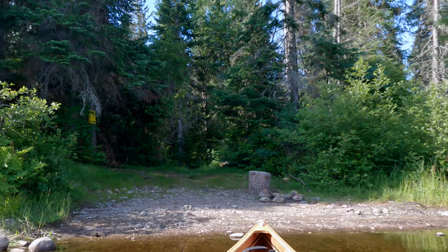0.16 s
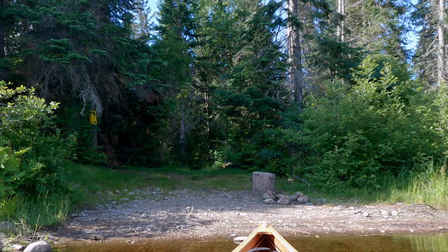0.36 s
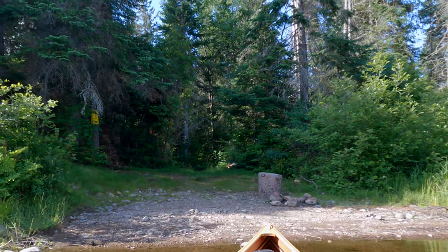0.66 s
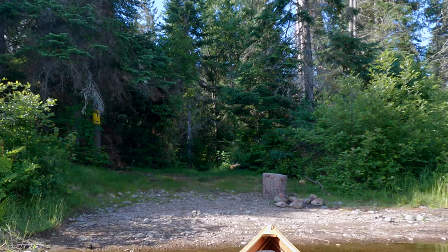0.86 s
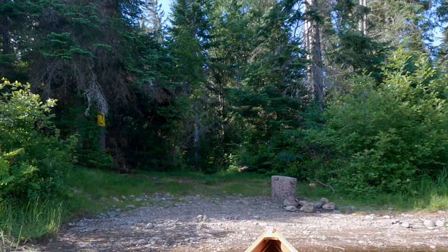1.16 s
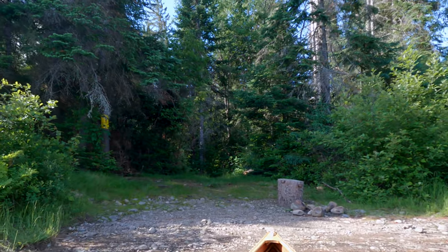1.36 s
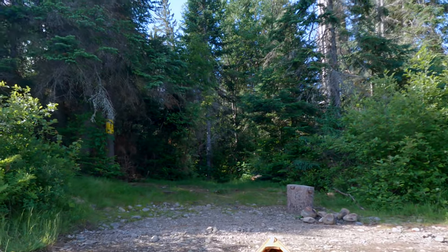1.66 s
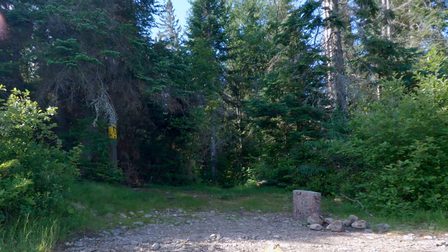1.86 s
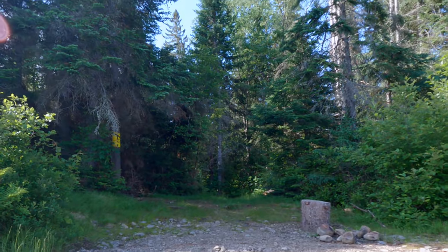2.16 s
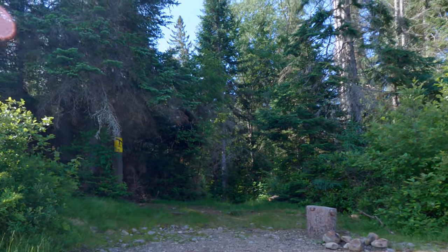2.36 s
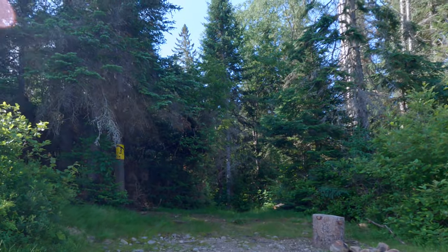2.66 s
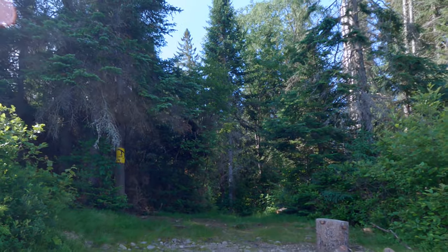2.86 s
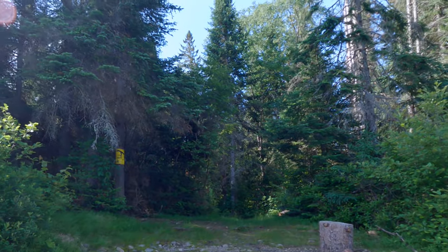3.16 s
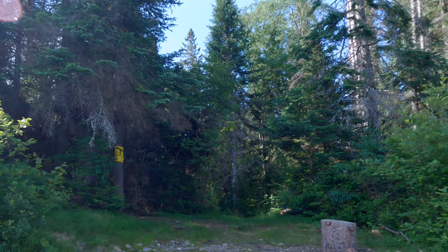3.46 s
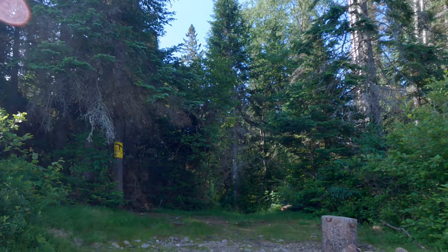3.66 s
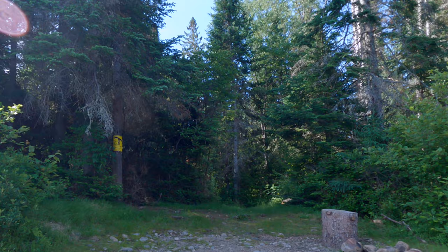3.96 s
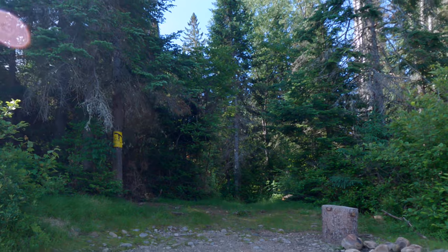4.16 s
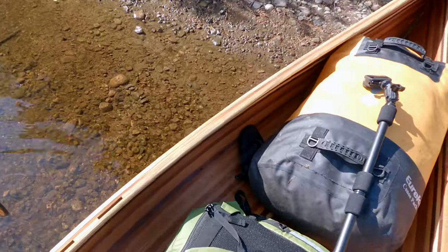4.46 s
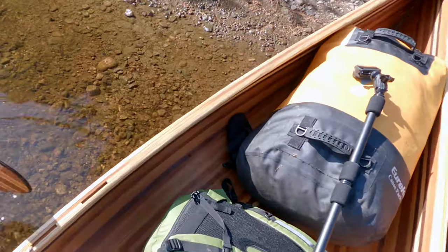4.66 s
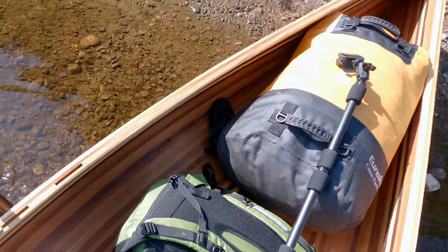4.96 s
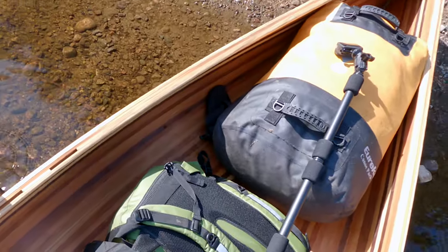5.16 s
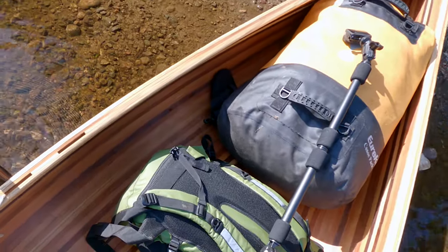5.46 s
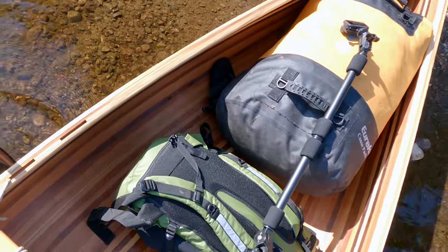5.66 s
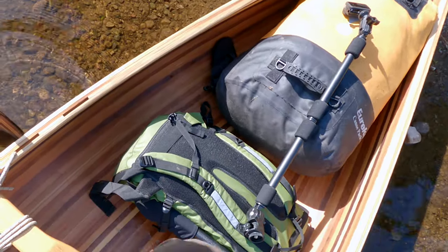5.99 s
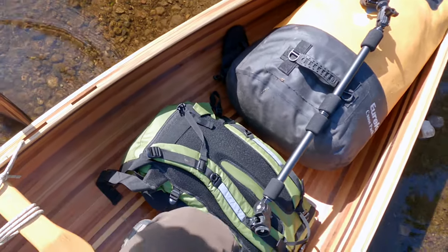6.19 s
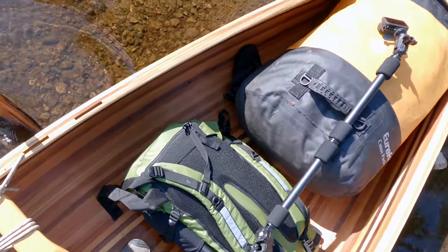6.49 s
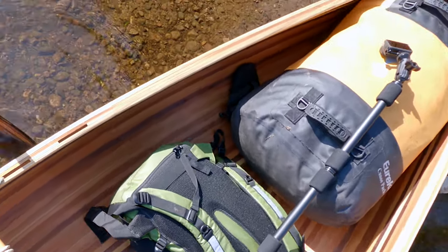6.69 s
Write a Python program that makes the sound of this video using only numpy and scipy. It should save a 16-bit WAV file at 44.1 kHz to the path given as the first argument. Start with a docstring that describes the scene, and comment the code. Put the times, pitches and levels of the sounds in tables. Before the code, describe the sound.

Water bubbles and wind rumbles close by before a hull scrapes harshly onto stones; after a short gap, light wooden knocks and soft thumps follow.

```python
"""Canoe landing on gravel

Close by, a wooden canoe glides through gurgling shallows: ringing bubbles over washes of filtered noise, with
low wind rumble on the microphone and one far bird whistle. It grinds up the shore in a long push and lurches,
random slips exciting the modes of the shuddering, groaning hull, while stones snap, crunch and squeak. After a
short silent break it lies aground: a paddle knocks and slides on it, and shifting weight thumps and drags."""
import sys
import numpy as np
from scipy import signal
from scipy.fft import rfft, irfft
from scipy.io import wavfile
from scipy.ndimage import uniform_filter1d

SR = 44100
rng = np.random.default_rng(int(sys.argv[2]) if len(sys.argv) > 2 else 0)


def to_wav(s):
    """Save 16-bit WAV."""
    ch = np.atleast_2d(s).T  # columns
    pcm = np.round(np.clip(ch, -1, 1) * 32767)  # PCM
    wavfile.write(sys.argv[1], SR, pcm.astype(np.int16))


N = 301201
TIME = np.arange(N) / SR
RING_TIME = TIME[:SR // 4]   # time axis of every single short sound

# Larger air pockets in the water. Each row: start in seconds, level in dB, pitch in Hz, ring in seconds.
GURGLES = [(.24, -45, 1950, .05), (0.313, -39, 1870, 0.049), (.345, -45, 1380, 0.026),
           (0.36, -34, 747, 0.028), (0.372, -26.5, 592, 0.053), (0.443, -38, 1510, 0.017),
           (0.603, -36, 1410, 0.028), (.669, -28, 1330, 0.018), (0.774, -38, 1590, 0.062),
           (.857, -24.5, 870, 0.012), (0.943, -31, 546, 0.05), (.909, -35, 1600, .04),
           (.977, -35, 1210, .03), (1.027, -36.5, 1420, 0.035), (1.095, -47, 1910, .04),
           (1.39, -39, 1044, .07), (1.219, -31.5, 1150, 0.035), (1.339, -31, 1100, 0.023),
           (1.676, -42.5, 1354, 0.069), (1.854, -44.5, 486, 0.075), (2.022, -50, 1830, 0.054)]
# Swirls whose cavity opens or closes. Each row: start in seconds, peak in dB, first pitch in Hz,
# last pitch in Hz, length in seconds.
SWIRLS = [(0.169, -47, 420, 745, 0.074), (.258, -49, 700, 1000, 0.04), (0.259, -53, 1930, 2480, .03),
          (.308, -51, 2450, 2140, 0.021), (0.911, -36.5, 735, 1100, 0.03), (0.931, -42, 1610, 1450, 0.029),
          (0.958, -46, 1590, 1390, 0.017), (1.232, -36, 820, 1190, .032), (2.06, -53.5, 840, 970, 0.035),
          (2.213, -51, 780, 990, 0.032), (2.231, -49, 1500, 1320, 0.028), (2.238, -53, 730, 920, 0.032),
          (2.257, -50.5, 1150, 1480, 0.025)]
# Drops falling back on the water. Each row: start in seconds, level in dB, pitch in Hz.
DROPS = [(.513, -50, 2880), (.541, -47, 3800), (.639, -50, 2900), (0.669, -40, 2720), (.675, -46, 3580),
         (.686, -44, 2720), (.768, -42, 2890), (.819, -47, 3420), (.887, -59, 2830), (.941, -50, 5300),
         (.949, -50, 4050), (.975, -54, 4020), (1.025, -48, 2930), (1.141, -46, 2950), (1.143, -43, 3800),
         (1.153, -45, 5200), (1.159, -36.5, 4080), (1.197, -49, 2830), (1.22, -43, 2880),
         (1.243, -40, 2980), (1.268, -47, 5230), (1.286, -44, 3030), (1.338, -54, 3950), (1.37, -52, 2850),
         (1.398, -50, 5060), (1.409, -44, 3890), (1.427, -46, 3230), (1.474, -43, 2450),
         (1.476, -45.5, 3900), (1.541, -43, 2770), (1.598, -48, 2620)]
# Ripple along the gliding hull. Each row: time in seconds, relative level in dB.
RIPPLE = [(0, -62.5), (.33, -49.5), (.5, -59), (.75, -48.5), (1.25, -46), (1.8, -55.5), (2.05, -64),
          (2.25, -58), (2.48, -60)]
# Wavelets slapping the bow. Each row: start in seconds, hold in seconds, relative level in dB.
LAPS = [(0.37, .012, -55), (0.808, 0.061, -32.5), (0.895, 0.16, -47.5), (1.231, 0.036, -36.5),
        (1.31, 0.027, -62), (2.16, 0.027, -64)]
# Low rumbles: gusts on the microphone and, near 3.6-4.0 s, the shuddering hull.
# Each row: start in seconds, hold in seconds, relative level in dB.
RUMBLES = [(0, 0.48, -35.5), (0.604, 0.34, -35.5), (1.186, 0.32, -37), (1.633, 0.081, -43),
           (1.883, 0.16, -44.5), (2.252, 0.11, -40.5), (2.526, 0.58, -42), (3.615, 0.048, -35),
           (3.997, 0.036, -35), (6.0, 0.23, -45), (6.45, 0.45, -58)]
# Dull blows on the hull. Each row: start in seconds, level in dB, pitch in Hz, treble cutoff in Hz,
# ring in seconds.
THUMPS = [(.001, -24, 276, 465, 0.15), (.004, -24.5, 156.4, 303, 0.27), (2.154, -39, 172, 900, 0.23),
          (2.426, -46.5, 159, 1080, 0.012), (2.655, -23, 139, 250, 0.22), (2.715, -27, 139, 252, 0.16),
          (2.76, -26.5, 109, 250, 0.31), (2.821, -21, 175.5, 249, 0.33), (3.055, -29, 138, 250, 0.15),
          (3.94, -20, 154.3, 496, 0.13), (3.968, -21, 125, 550, 0.071), (3.997, -23.5, 169, 398, 0.11),
          (4.180, -31.5, 128.5, 497, 0.13), (5.612, -37.5, 204, 364, 0.13),
          (5.980, -28.5, 186.5, 770, 0.08), (6.051, -35.5, 150, 610, 0.052), (6.115, -47, 156, 600, 0.06),
          (6.209, -36.5, 152, 590, 0.074), (6.317, -41, 164, 804, 0.14), (6.436, -38.5, 165, 800, 0.23),
          (6.734, -47, 189, 700, 0.76)]
# Soft bumps of the floor as the grounded boat rocks. Each row: start in seconds, level in dB.
BUMPS = [(4.569, -51.5), (4.781, -53), (4.945, -47), (5.032, -44.5), (5.109, -48), (5.139, -42),
         (5.175, -43.5), (5.372, -43.5), (5.531, -50.5)]
# Modes of the hull's floor. Each row: multiple of its pitch, relative level in dB, share of the ring time.
FLOORBOARD = [(1, 13.5, 0.95), (1.43, 5, 0.94), (1.8, -27.5, 0.41), (2.359, -18, 0.34), (2.75, -0.5, 0.6),
              (3.6, -27.5, 0.18)]
# The long push. Each row: time in seconds, relative grinding level in dB, weight on the keel in dB.
PUSH = [(2.555, -49.5, -1), (2.6, -35.5, -14), (2.64, -27, 0.5), (2.72, -26, 3.5), (2.83, -25.5, 1),
        (2.89, -26, -2.5), (3.03, -26, -1), (3.17, -31.5, -2.5), (3.3, -31, -2), (3.41, -29.5, 2.5),
        (3.48, -32.5, -5.5), (3.6, -30, -2.5), (3.72, -35, 10.5), (3.79, -42.5, -1), (3.85, -45, 5.5),
        (3.92, -38, 7), (4.06, -43.5, 5.5), (4.17, -45, 7.5), (4.24, -47.5, 5.5), (4.37, -47, -0.5)]
# Lurches over stones. Each row: start in seconds, hold in seconds, relative grinding level in dB,
# weight on the keel in dB.
LURCHES = [(2.5, 0.025, -43, -7.5), (2.696, 0.077, -25.5, -17), (3.021, 0.0033, -20, -24),
           (3.37, 0.041, -27, -6), (3.669, 0.028, -35.5, 14.5), (3.827, 0.0054, -31.5, -0.5),
           (3.858, .008, -33, 1.5), (3.89, 0.052, -27, 1), (3.959, 0.025, -40.5, 22),
           (4.025, .008, -37.5, -26), (4.081, 0.036, -35, -5), (4.133, 0.0043, -39.5, 9),
           (4.173, 0.033, -40.5, -0.5)]
# Modes of the hull on the gravel. Each row: pitch in Hz, relative level in dB, 60 dB decay in seconds.
HULL = [(142, -1, 0.21), (180, -5, 0.17), (252.5, 8, 0.074), (280, 1.5, 0.39), (367.8, 3, 0.072),
        (570, -4, 0.25), (614.7, -7, 0.18), (725, -17.5, 0.12), (912, 9.5, 0.091), (995, -3, 0.29),
        (1124, 0, 0.19), (1292, 1, 0.2), (1417, 5.5, 0.068), (1529, 1.5, 0.18), (1950, 6.5, .06),
        (2058, -6.5, 0.084), (3040, 14.5, 0.034), (3620, 1, 0.079), (3900, 7.5, 0.065)]
# Pitch of the planks over the point of contact. Each row: time in seconds, pitch in Hz.
CONTACT = [(2.6, 1040), (2.73, 930), (2.886, 1250), (3.066, 1190), (3.316, 1380), (3.354, 1060),
           (3.476, 1310), (3.696, 1010), (3.754, 1265), (4.208, 1080), (4.262, 1320), (4.35, 943)]
# Stones that snap out from under the keel, and two low groans of the hull (at 3.676 and 3.968 s).
# Each row: start in seconds, level in dB, pitch in Hz, ring in seconds.
SNAPS_AND_GROANS = [(2.499, -48, 1720, 0.12), (2.634, -17.5, 1106, 0.3), (2.670, -19, 966, 0.014),
                    (2.700, -30.5, 4130, 0.4), (2.703, -22.5, 720, 0.13), (2.734, -39, 5580, 0.04),
                    (2.732, -32.5, 3800, .04), (2.759, -34, 1505, .015), (2.817, -37.5, 3850, .04),
                    (2.902, -25.5, 1450, .02), (2.935, -23, 1320, .022), (3.021, -32.5, 7100, 0.06),
                    (3.03, -21, 1340, 0.022), (3.289, -22, 1396, 0.031), (3.289, -33, 3126, 0.03),
                    (3.288, -47, 4700, .02), (3.37, -30.5, 740, 0.041), (3.382, -39.5, 7200, 0.05),
                    (3.384, -38, 3310, .02), (3.661, -31, 1010, 0.014), (3.676, -20.5, 624, 0.28),
                    (3.691, -38, 3160, 0.056), (3.817, -39, 3360, 0.13), (3.889, -34.5, 5040, 0.04),
                    (3.968, -23.5, 540, 0.047), (4.089, -39, 1330, 0.036), (4.108, -44, 4500, .04),
                    (4.111, -38.5, 1160, .05), (4.254, -39, 1330, 0.025), (4.285, -40, 5550, 0.043),
                    (4.308, -42, 1250, 0.023), (4.313, -35, 715, 0.06), (4.319, -39.5, 1077, 0.036)]
# Sharp stones along the varnish. Each row: start in seconds, peak in dB, pitch in Hz, length in seconds.
SQUEAKS = [(2.567, -45, 4750, 0.022), (2.695, -30, 3945, .016), (2.725, -31, 6860, 0.012),
           (2.78, -37, 8100, 0.012), (2.96, -37.5, 2410, .018), (3.13, -43, 4950, 0.019),
           (3.721, -43.5, 3550, 0.039)]
# Paddle sliding along the gunwale. Each row: start in seconds, hold in seconds, relative level in dB,
# treble above body in dB, pitch in Hz.
SLIDES = [(4.66, 0.08, -62, -0.5, 1430), (4.834, 0.031, -51, -3, 1160), (4.876, 0.27, -54, -1, 2070),
          (5.328, 0.08, -68, 14.5, 4050), (5.678, 0.15, -58, -2.5, 2090), (5.877, 0.19, -54.5, 1, 1550),
          (6.044, 0.25, -57, 1.5, 1830), (6.387, 0.026, -49, 7, 2780), (6.448, 0.078, -50, 2, 690),
          (6.598, 0.013, -48, -1.5, 1145), (6.744, 0.011, -42.5, -4, 920), (6.745, 0.013, -50, -3, 4180),
          (6.803, .015, -49.5, -11, 4140), (6.813, 0.05, -39, -4.5, 944)]
# Paddle on the gunwale. Each row: start in seconds, level in dB, treble cutoff in Hz, loss per bounce in dB,
# pitch of the struck spot in Hz, damping time in seconds.
KNOCKS = [(4.909, -47.5, 2500, 3, 1370, 0.16), (4.951, -60, 6000, 20, 4200, .02),
          (4.981, -54, 2800, 20, 1900, 0.034), (5.001, -52, 2000, 15, 1400, 0.045),
          (5.059, -43, 4000, 28, 3400, 0.037), (5.070, -36.5, 3840, 13, 875, 0.63),
          (5.136, -30, 4160, 3.5, 1430, 0.29), (5.240, -50, 2300, 49, 1410, 0.052),
          (5.309, -64, 3500, 20, 2320, .03), (5.408, -55.5, 2500, 18, 1570, 0.033),
          (5.615, -36, 4130, 5, 1960, .5), (5.630, -44, 3600, 14, 2080, .1),
          (5.647, -51, 4500, 18, 2400, .05), (5.688, -60, 2500, 18, 1900, .04),
          (5.711, -56, 2600, 19, 2080, 0.046), (5.753, -44, 2120, 4, 1520, 0.13),
          (5.983, -51.5, 4500, 17, 2220, 0.062), (6.186, -55, 5000, 20, 4000, .05),
          (6.212, -54, 4000, 20, 2000, .1), (6.361, -46.5, 4180, 3, 2300, .03),
          (6.389, -47, 4200, -1.5, 2580, 0.045), (6.403, -40, 3600, 16, 2090, 0.046),
          (6.420, -30, 2170, 10, 1380, 0.2), (6.595, -42.5, 4960, 8, 3240, .025),
          (6.734, -38, 2170, 6, 900, 0.17), (6.752, -38, 1380, 20, 920, 0.094),
          (6.798, -35.5, 1200, 3, 890, 0.11)]
# Modes of paddle and gunwale. Each row: pitch in Hz, relative level in dB, 60 dB decay in seconds.
GUNWALE = [(658, -17, 0.34), (879, -0.5, 0.076), (1204, 1, 0.048), (1390, -0.5, 0.032), (1633, -9, 0.087),
           (2034, 4.5, 0.024), (2070, -10, 0.27), (2560, -5.5, 0.025), (2945, -3, 0.072), (3425, 3, 0.022),
           (3885, -4, 0.047), (4470, -7, 0.061), (5270, -6.5, 0.081)]
# Weight dragged softly over the floor. Each row: start in seconds, hold in seconds, level in dB.
DRAGS = [(5.987, 0.1, -52.5), (6.218, .06, -57.5), (6.44, 0.053, -49.5)]
# Filter curves, one for each layer. Each row: frequency in Hz, relative level in dB.
AIR_COLOUR = [(70, -40.5), (130, -5.5), (200, 2), (420, -12.5), (1100, -8.5), (2050, -12.5), (2700, -17.5),
              (4200, -18.5), (7600, -30), (12800, -44.5), (15000, -66.5)]
WATER_COLOUR = [(59, 10.5), (100, 2), (252, 0), (359, -8), (748, -15), (867, -16), (1700, -10),
                (2320, -21.5), (2920, -20.5), (3460, -25.5), (4000, -21.5), (7830, -32.5), (13200, -51.5),
                (15000, -74.5)]
HISS_COLOUR = [(2500, -30), (4200, 1.5), (5300, 1.5), (6300, -2.5), (7300, 3), (7900, 5.5), (8500, -10),
               (13000, -33)]
SPRAY_COLOUR = [(1180, -38), (2000, -3), (2270, -5), (4380, 0), (8530, -12), (13700, -28), (15000, -36)]
RUMBLE_COLOUR = [(8.8, -48), (15, 3), (42, 2), (139, -10.5), (172, -14), (210, -17), (250, -17),
                 (320, -35.5), (550, -120)]
BOOM_COLOUR = [(24, -46), (45, -20), (85, -1), (134, -3.5), (215, 0.5), (274, -0.5), (350, 7), (483, 2.5),
               (599, 5), (795, -10), (874, 0.5), (1000, -3), (1300, -32.5), (2200, -120)]
GRAVEL_COLOUR = [(290, -29), (500, 12.5), (611, 4.5), (791, -4.5), (875, -9), (1290, -1.5), (1790, -8),
                 (2160, -6), (2680, -17.5), (3890, -17), (6160, -29), (6810, -27.5), (8570, -32),
                 (13600, -53.5), (15400, -62.5)]
RUB_COLOUR = [(180, 10.5), (300, -6.5), (480, -12.5), (650, -9), (820, -12.5), (980, -7.5), (1150, -8.5),
              (1400, -9), (2000, -3.5), (2900, -11.5), (4000, -11), (5000, -16), (8300, -24.5),
              (15000, -46)]

AIR_DB = -60
WASH_DB, WASH_FOLLOWS = -34, 0.49   # the low wash swings less than the ripple
LAP_ATTACK_S, LAP_RELEASE_S = 0.0049, 0.033
LAP_POCKET_HZ = 395   # air trapped under the bow rings with each wavelet
BUBBLE_RISE_PER_S = 4.8   # share of its pitch that a rising air pocket gains in a second
DROP_RING_S, DROP_RISE = 0.02, 0.05   # the rise is a share of the pitch
DROP_SPLASH_DB = -7   # the soft splash round each drop
HISS_S, HISS_HOLD_S, HISS_DB = 1.2, 0.13, -70   # the bow wave hisses in the shallows
SPRAY_DB, SPRAY_FADE_DB_PER_S = -55.5, 72   # the last spray off the bow dies away
RUMBLE_ATTACK_S, RUMBLE_RELEASE_S, CALM_DB = 0.093, 0.084, -80   # calm on the same scale as the rumbles
BUMP_PITCH_HZ, BUMP_BRIGHT_HZ, BUMP_RING_S = 185.4, 299, 0.072
BIRD_DB = -77.5   # where the whistle begins
BOOM_DB, GRIT_DB = -2.5, -9.5   # gains against the grinding, ahead of the mix in scrape()
LURCH_ATTACK_S, LURCH_RELEASE_S = 0.0033, 0.019
WEIGHT_MUFFLES = 0.15   # dB of grit lost for each dB of weight; the boom gains it in full
CONTACT_WIDTH_OCT, CONTACT_DB = 0.35, -5
SMALL_SQUEAKS_DB, CRUNCH_DB, CHIPS_DB = -9.5, -5, -8   # within their bands of the scrape
STONE_PING_DB, STONE_PING_S = 1, 0.036   # the brief pure ring, against its crack
SQUEAK_WAVER = 0.024   # share of the pitch by which a squeak wavers
SLIDE_ATTACK_S, SLIDE_RELEASE_S = 0.043, 0.048
SING_DB, SING_WIDTH = -7.5, 1.043   # the band that sings under a slide: level, band edge over centre
CRACKLE_PER_S, CRACKLE_DB = 420, -7   # sand under the paddle
BOUNCE_S = 0.0044   # each knock chatters twice more
SPOT_DB, SPOT_WIDTH, SPOT_RING_S = -0.5, 1.266, 0.11   # the struck spot: level, band edge over centre, decay
RATTLE_DB, RATTLE_S = -13, .17
TICK_DB, TICK_TOP_HZ = -19, 9000   # the first touch of a knock
STOP_S, RESUME_S = 4.374, 4.555   # the silent break
CUTOFF_HZ = 15400


def from_db(db):
    """Decibels to gain."""
    return 10 ** (np.asarray(db) / 20)


def rms_one(x):
    """Scale to unit power."""
    return x / np.sqrt(np.mean(x ** 2) + 1e-20)


def evened(x):
    """Hold the slow level at 1 and keep the grain."""
    return x / np.sqrt(np.maximum(uniform_filter1d(x ** 2, size=3000), 1e-20))


def cut(x, hz, kind, order=2):
    """Butterworth filter."""
    sos = signal.butter(order, np.clip(hz, 10, .45 * SR), kind, fs=SR, output="sos")
    return signal.sosfilt(sos, x + 1e-18)


def band(x, hz, width):
    """One resonant band, from hz / width to hz * width."""
    width = max(width, 1.02)
    return cut(x, [hz / width, hz * width], "band")


def colour(x, spectrum):
    """Causal (minimum-phase) filter with the given spectrum."""
    size = 8192
    hz, db = np.transpose(spectrum)
    grid = np.maximum(np.arange(size // 2 + 1) * SR / size, 1)
    level_db = np.interp(np.log(grid), np.log(hz), db)
    # folding the cepstrum onto positive times makes the phase minimal
    cepstrum = irfft(np.log(from_db(level_db)))[:size // 2]
    cepstrum[1:] *= 2
    response = irfft(np.exp(rfft(cepstrum, size)))
    return signal.oaconvolve(x, response)[:N]


def noise(spectrum):
    """Smooth coloured noise of unit power."""
    return rms_one(colour(rng.standard_normal(N), spectrum))


def drift(rate):
    """Random wander of unit power, with `rate` turning points drawn per second."""
    knots = rng.standard_normal(N // 20)
    return rms_one(np.interp(TIME * rate, np.arange(len(knots)), knots))


def gains(rows):
    """Level columns as gains in time, fading out beyond their ends."""
    s, *columns = np.transpose(rows)
    outside = np.maximum(s[0] - TIME, 0) + np.maximum(TIME - s[-1], 0)
    ends = np.exp(-(outside / 0.026) ** 2)
    return [from_db(np.interp(TIME, s, db)) * ends for db in columns]


def stroke(s, hold_s, attack_s, release_s):
    """An envelope that swells up to its moment, holds and dies away."""
    before = (np.maximum(s - TIME, 0) / attack_s) ** 2
    after = np.maximum(TIME - s - hold_s, 0) / release_s
    return np.exp(-np.minimum(before + after, 20))


def fade(t60):
    """A ring that loses 60 dB in t60 seconds."""
    return np.exp(-np.log(1000) * RING_TIME / t60)


def swell(rise_s):
    """A contact takes a moment to build up."""
    return 1 - np.exp(-RING_TIME / rise_s)


def add(out, s, sound):
    """Mix a short sound in at a time."""
    at = max(round(s * SR), 0)
    out[at:at + len(sound)] += sound[:max(N - at, 0)]


def at_level(blow, db):
    """Scale a blow to the level it would have with all its energy in 12 ms."""
    return from_db(db) * blow * np.sqrt(.012 * SR / np.sum(blow ** 2))


def struck(modes, spread_db):
    """Ring of a body: every blow meets each mode with its own strength and sign."""
    ring = 0
    for hz, db, t60 in modes:
        strength = from_db(db + spread_db * rng.standard_normal()) * rng.choice([-1, 1])
        ring = ring + strength * fade(t60) * np.sin(2 * np.pi * hz * RING_TIME)
    return ring


def splinter(t60):
    """Decaying noise: the many crowded overtones of wood, dying together."""
    return rng.standard_normal(len(RING_TIME)) * fade(t60)


def contacts(per_s, spread_db, clump_db):
    """Random slips, mostly small and a few large, coming in clumps."""
    out = np.zeros(N)
    at = np.flatnonzero(rng.random(N) < per_s / SR)
    size, side = rng.exponential(1, N)[at], rng.random(N)[at]
    level_db = spread_db * np.minimum(size, 4) + clump_db * drift(90)[at]
    out[at] = from_db(level_db) * np.sign(side - .5)
    return out


def through_wood(modes, per_s, spread_db, clump_db, wander_db, modes_db, planks_db, planks_t60):
    """Slips wander among six places on wood: each gives a click, the body's modes and a blur of overtones."""
    out = 0
    for place in range(6):
        response = at_level(struck(modes, spread_db=0.5), modes_db) + at_level(splinter(planks_t60), planks_db)
        response[:1] += at_level(np.ones(1), 0)   # the click
        slips = contacts(per_s, spread_db, clump_db) * from_db(wander_db * drift(16))
        out = out + signal.oaconvolve(slips, response)[:N]
    return out


def power_one_over(span, x):
    """Scale to unit power over a span of seconds."""
    return x / np.sqrt(np.sum(x ** 2) / (SR * (span[1] - span[0])))


def grain_cloud(span, low_hz, high_hz, t60_at_1k, spread_db, rise, count):
    """Small ringing things at random moments and pitches; the high ones die sooner."""
    out, t = np.zeros(N), RING_TIME[:SR // 16]
    for when, width, strength, bend in rng.random((count, 4)):
        hz = low_hz * (high_hz / low_hz) ** width
        age = t * np.sqrt(hz / 1000) / t60_at_1k
        bent_time = t * (1 + rise * bend * np.minimum(age, 1))
        ring = np.sin(2 * np.pi * hz * bent_time) * np.exp(-np.log(1000) * age)
        add(out, span[0] + when * (span[1] - span[0]), from_db(spread_db * strength ** 3) * ring)
    return power_one_over(span, out)


def glide(first_hz, last_hz, length_s, waver):
    """A short note that swells, slides in pitch with a random waver, and fades."""
    size = int(np.clip(length_s, .003, .2) * SR)
    chance = np.interp(RING_TIME[:size] * 700, np.arange(200), rng.standard_normal(200))
    pitch = np.geomspace(first_hz, last_hz, size) * (1 + waver * chance)
    return np.sin(2 * np.pi * np.cumsum(pitch) / SR) * np.hanning(size)


def air():
    """Steady, faint background air: coloured noise."""
    return from_db(AIR_DB) * noise(AIR_COLOUR)


def bubble(hz, t60, rise):
    """An air pocket rings and rises in pitch as it nears the surface."""
    pitch = hz * (1 + rise * np.minimum(RING_TIME / t60, 1))
    return np.sin(2 * np.pi * np.cumsum(pitch) / SR) * fade(t60) * swell(0.0008)


def wash_and_laps(flow, ripple):
    """The low wash follows the ripple; wavelets slap the bow and ring the air trapped under it."""
    slosh = rms_one(cut(flow, [320, 620], "band", order=3)) * from_db(3.5 * drift(25.0))
    pocket = rms_one(band(flow, LAP_POCKET_HZ, 1.12))
    laps = sum(from_db(db) * stroke(s, hold_s, LAP_ATTACK_S, LAP_RELEASE_S) for s, hold_s, db in LAPS)
    wash = from_db(WASH_DB) * ripple ** WASH_FOLLOWS * slosh
    return wash + laps * (from_db(-18.5) * slosh + from_db(-16.5) * pocket)


def ripple_bubbles(flow):
    """A cloud of small ringing bubbles under a flickering fizz of noise."""
    cloud = grain_cloud((0, 2.6), low_hz=573.4, high_hz=6800, t60_at_1k=0.044, spread_db=6.5, rise=0.16,
                        count=1500)
    cloud = evened(cut(colour(cloud, WATER_COLOUR), 280, "high"))
    fizz = rms_one(cut(flow, 1400, "high")) * from_db(2.0 * drift(70))
    return from_db(-4.0) * cloud + from_db(-13.0) * fizz


def water():
    """Wash, slapping wavelets and bubbling ripple, with single gurgles, swirls, drops, hiss and spray."""
    ripple, = gains(RIPPLE)
    flow = noise(WATER_COLOUR)
    out = wash_and_laps(flow, ripple) + ripple * ripple_bubbles(flow)
    for s, db, hz, t60 in GURGLES:
        splash = cut(splinter(t60), [hz, hz * 2], "band") * swell(0.0009)
        add(out, s, from_db(db) * (bubble(hz, t60, BUBBLE_RISE_PER_S * t60) + 0.48 * splash))
    for s, db, first_hz, last_hz, length_s in SWIRLS:
        add(out, s, from_db(db) * glide(first_hz, last_hz, length_s, waver=0.046))
    for s, db, hz in DROPS:
        splash = cut(splinter(0.023), [hz / 4.0, hz * 1.24], "band")
        add(out, s, from_db(db) * (bubble(hz, DROP_RING_S, DROP_RISE) + from_db(DROP_SPLASH_DB) * splash))
    bow_wave = stroke(HISS_S, HISS_HOLD_S, attack_s=0.12, release_s=0.23)
    hiss = from_db(HISS_DB) * bow_wave * noise(HISS_COLOUR)
    spray = from_db(SPRAY_DB - SPRAY_FADE_DB_PER_S * TIME) * noise(SPRAY_COLOUR)
    return out + hiss + spray


def low_rumbles():
    """Gusts on the microphone and the shuddering hull: low noise under swelling envelopes."""
    strength = from_db(CALM_DB)
    for s, hold_s, db in RUMBLES:
        strength = np.maximum(strength, from_db(db) * stroke(s, hold_s, RUMBLE_ATTACK_S, RUMBLE_RELEASE_S))
    return from_db(-7.0) * strength * from_db(1.0 * drift(4.5)) * evened(noise(RUMBLE_COLOUR))


def thumps():
    """Soft, heavy blows and the rocking of the boat set its floor booming."""
    out = np.zeros(N)
    bumps = [(s, db, BUMP_PITCH_HZ, BUMP_BRIGHT_HZ, BUMP_RING_S) for s, db in BUMPS]
    for s, db, pitch_hz, bright_hz, t60 in list(THUMPS) + bumps:
        modes = [(multiple * pitch_hz, level, share * t60) for multiple, level, share in FLOORBOARD]
        boom = struck(modes, spread_db=5.5)
        thud = cut(splinter(t60), [110, 900], "band")
        blow = (at_level(boom, 0) + at_level(thud, -4.5)) * swell(0.00059)
        add(out, s, at_level(cut(cut(blow, bright_hz, "low"), 92, "high"), db))
    return out


def far_bird():
    """One thin, wavering, slowly falling whistle from the forest, firmest towards its end."""
    pitch = np.interp(TIME, [1.75, 1.87, 2.0, 2.1], [5220, 5150, 4970, 4950]) * (1 + 0.009 * drift(400))
    level, = gains([(1.78, BIRD_DB), (1.95, BIRD_DB - 2), (2.01, BIRD_DB + 4), (2.06, BIRD_DB + 3)])
    return level * from_db(3 * drift(110)) * np.sin(2 * np.pi * np.cumsum(pitch) / SR)


def hull_effort():
    """Gains of boom, grind and grit: push plus lurches, where more weight booms more and spits less."""
    pushes = [gains(PUSH)]
    for s, hold_s, db, weight_db in LURCHES:
        level = from_db(db) * stroke(s, hold_s, LURCH_ATTACK_S, LURCH_RELEASE_S)
        pushes.append((level, from_db(weight_db)))
    boom = np.sqrt(sum((level * weight) ** 2 for level, weight in pushes))
    grind = np.sqrt(sum(level ** 2 for level, weight in pushes))
    grit = np.sqrt(sum((level * np.maximum(weight, .1) ** -WEIGHT_MUFFLES) ** 2 for level, weight in pushes))
    return from_db(BOOM_DB) * boom, grind, from_db(GRIT_DB) * grit


def contact_ring(x):
    """The planks over the point of contact ring at a pitch that moves as it travels along the keel."""
    centre = np.interp(TIME, *np.transpose(CONTACT))
    ring = 0
    for hz in np.geomspace(700, 2000, 9):
        nearness = np.exp(-(np.log2(hz / centre) / CONTACT_WIDTH_OCT) ** 2)
        ring = ring + band(x, hz, 1.07) * nearness
    return evened(ring)


def small_squeaks(span, low_hz, high_hz, count):
    """Many stones each sing for a few milliseconds as they drag; unit power over the span."""
    out = np.zeros(N)
    for when, width, strength, length in rng.random((count, 4)):
        hz = low_hz * (high_hz / low_hz) ** width
        note = glide(hz, hz, .004 + .014 * length, SQUEAK_WAVER) * (low_hz / hz) ** 1.5
        add(out, span[0] + when * (span[1] - span[0]), from_db(8 * strength ** 2) * note)
    return power_one_over(span, out)


def scrape():
    """The same slips boom in the hull, grind in the planks and spit as grit; pebbles clack and squeak."""
    span = (2.3, 4.5)
    boom, grind, grit = hull_effort()
    slips = through_wood(HULL, per_s=280, spread_db=2.0, clump_db=1.13, wander_db=2.5, modes_db=-5.0,
                         planks_db=4.5, planks_t60=0.057)
    pebbles = grain_cloud(span, low_hz=582, high_hz=8150, t60_at_1k=0.15, spread_db=8.0, rise=0, count=700)
    stones = colour(rms_one(slips) + from_db(-13.5) * pebbles, GRAVEL_COLOUR)
    crunch = grain_cloud(span, low_hz=560, high_hz=1900, t60_at_1k=0.022, spread_db=13, rise=0, count=520)
    chips = grain_cloud(span, low_hz=2700, high_hz=5400, t60_at_1k=0.009, spread_db=12, rise=0, count=600)
    squeal = small_squeaks(span, low_hz=2800, high_hz=8800, count=420)

    low = evened(cut(cut(colour(slips, BOOM_COLOUR), 595, "low", order=5), 60, "high"))
    mid = from_db(-1.0) * evened(cut(stones, [700, 2400], "band", order=4))
    mid = evened(mid + from_db(CONTACT_DB) * contact_ring(stones))
    mid = mid + from_db(CRUNCH_DB) * cut(crunch, 4000, "low")
    high = evened(cut(stones, 2730, "high", order=5))
    high = high + from_db(CHIPS_DB) * cut(chips, 8000, "low") + from_db(SMALL_SQUEAKS_DB) * squeal
    return boom * low + from_db(-3.0) * grind * mid + from_db(-2.0) * grit * high


def snaps_and_groans():
    """Stones let go, and the hull groans low twice: a ping, a crack and a short rattle round each pitch."""
    out = np.zeros(N)
    for s, db, hz, t60 in SNAPS_AND_GROANS:
        burst = splinter(t60)
        crack = cut(burst, [hz / 1.215, hz * 1.04], "band", order=3) + 1.2 * band(burst, hz, 1.4)
        ping = np.sin(2 * np.pi * hz * RING_TIME) * fade(STONE_PING_S) * np.sqrt(STONE_PING_S / t60)
        add(out, s, at_level(crack / np.abs(crack).max() + from_db(STONE_PING_DB) * ping, db))
    return cut(out, 11000, "low")


def squeaks():
    """Single sharp stones drag along the hull, each a short wavering note."""
    out = np.zeros(N)
    for s, db, hz, length_s in SQUEAKS:
        add(out, s, from_db(db) * glide(hz, hz, length_s, SQUEAK_WAVER))
    return out


def rubbing():
    """The paddle slides in small slips and crackles over sand; each stretch of gunwale sings at its pitch."""
    slips = through_wood(GUNWALE, per_s=110, spread_db=0.5, clump_db=3.0, wander_db=2, modes_db=-17.5,
                         planks_db=4.5, planks_t60=0.061)
    slips = colour(slips, RUB_COLOUR)
    body = rustle = sing = 0
    for s, hold_s, db, treble_db, hz in SLIDES:
        slide = from_db(db) * stroke(s, hold_s, SLIDE_ATTACK_S, SLIDE_RELEASE_S)
        body = np.maximum(body, slide)
        rustle = np.maximum(rustle, from_db(treble_db) * slide)
        sing = sing + slide * evened(band(slips, hz, SING_WIDTH))
    low = evened(cut(slips, [300, 1150], "band", order=3))
    sand = contacts(CRACKLE_PER_S, spread_db=2.5, clump_db=2)
    crackle = signal.oaconvolve(sand, splinter(.012))[:N]
    crackle = rms_one(cut(crackle, [1300, 4600], "band", order=4))
    high = evened(cut(slips, 1500, "high", order=3)) + from_db(CRACKLE_DB) * crackle
    return from_db(-2.0) * body * low + from_db(-5.0) * rustle * high + from_db(SING_DB) * sing


def knock_blow(bright_hz, spot_hz, damping_s):
    """One hit: tick, crack, ring of gunwale and struck spot, and loose rattle, duller when the contact is soft."""
    crack = at_level(cut(splinter(.05), [700, 7000], "band", order=1), -9)
    rattle = at_level(cut(splinter(RATTLE_S), [600, 4000], "band", order=1), RATTLE_DB)
    ring = at_level(struck(GUNWALE, spread_db=4.0), 0)
    spot = at_level(band(splinter(SPOT_RING_S), spot_hz, SPOT_WIDTH), SPOT_DB)
    blow = (ring + spot + crack + rattle) * swell(0.00018) * fade(damping_s)
    tick = cut(cut(splinter(0.067) * fade(damping_s), 2 * bright_hz, "low"), TICK_TOP_HZ, "low")
    return cut(blow, bright_hz, "low", order=3) + at_level(tick, TICK_DB)


def knocks():
    """Wood scuffs on wood, then hits and chatters."""
    out = np.zeros(N)
    for s, db, bright_hz, loss_db, spot_hz, damping_s in KNOCKS:
        for bounce in range(3):
            blow = knock_blow(bright_hz, spot_hz, damping_s)
            add(out, s + bounce * BOUNCE_S, at_level(blow, db - bounce * loss_db))
        # a reversed decay grows up to the moment of the hit
        scuff = cut(splinter(0.04), [700, min(bright_hz, 3500) + 700], "band", order=3)[::-1]
        add(out, s - RING_TIME[-1], at_level(scuff, db - 19))
    return out


def dragging():
    """Something heavy shifts on the floor of the hull in dull, uneven slips."""
    slips = through_wood(HULL, per_s=40, spread_db=4.0, clump_db=1.5, wander_db=3.5, modes_db=-3,
                         planks_db=-2, planks_t60=0.05)
    effort = sum(from_db(db) * stroke(s, hold_s, attack_s=.01, release_s=.03) for s, hold_s, db in DRAGS)
    return effort * evened(cut(slips, [110, 700], "band", order=3))


def scene():
    """All lies straight ahead; the grinding is a little wider."""
    grinding = scrape() + snaps_and_groans() + squeaks()
    boat = knocks() + thumps() + rubbing() + dragging()
    mid = grinding + boat + water() + low_rumbles() + far_bird() + air()
    scatter = splinter(0.035)
    scattered = signal.oaconvolve(grinding, scatter / np.linalg.norm(scatter))[:N]
    side = colour(scattered, [(40, -12.5), (150, -35.5), (600, -17.5), (4000, -25.0), (8000, -22.0),
                              (13000, -2.5)])
    # the right port hears a little more treble
    lean = colour(grinding, [(150, -48.0), (600, -30), (2000, -26.0), (8000, -18.5)])
    return np.array([mid + side - lean, mid - side + lean])


def record(dry):
    """The sound stops dead for a moment and comes back quickly; the top is cut."""
    running = np.where(TIME < STOP_S, 1, np.clip((TIME - RESUME_S) / 0.032, 0, 1))
    top_cut = signal.cheby2(14, 70, CUTOFF_HZ + 700, fs=SR, output="sos")
    return signal.sosfilt(top_cut, dry * running)


dry = scene()
out = record(dry)
to_wav(out)
```